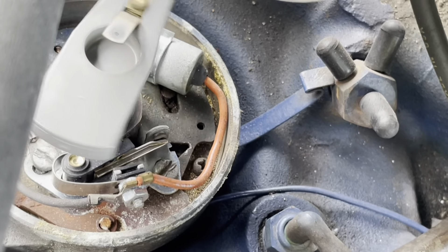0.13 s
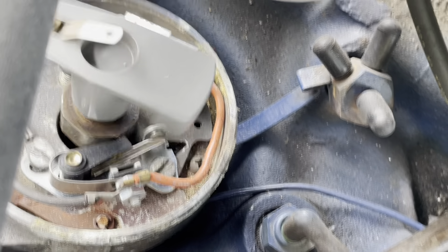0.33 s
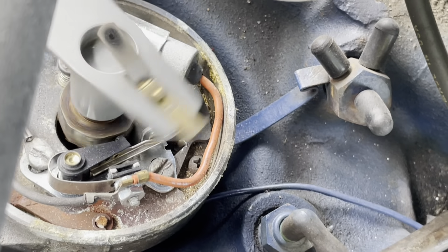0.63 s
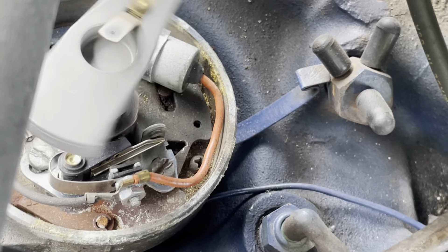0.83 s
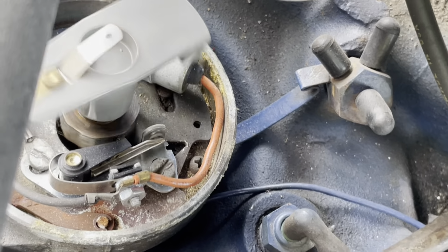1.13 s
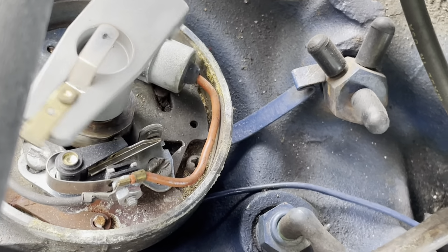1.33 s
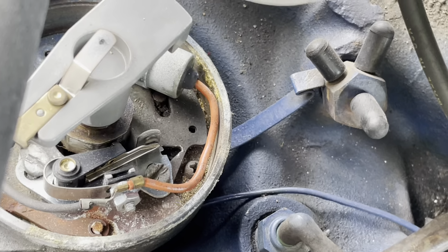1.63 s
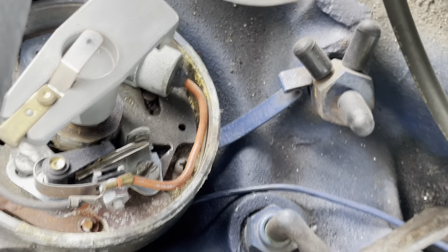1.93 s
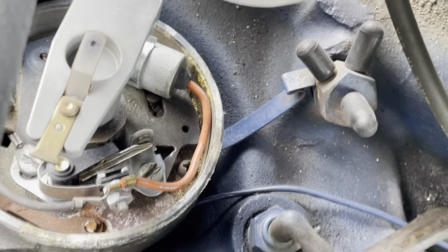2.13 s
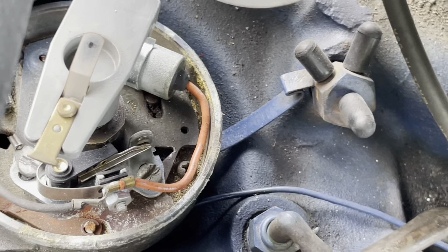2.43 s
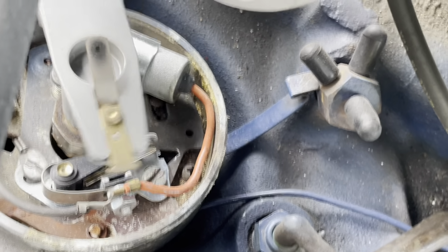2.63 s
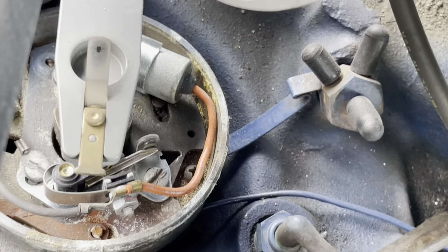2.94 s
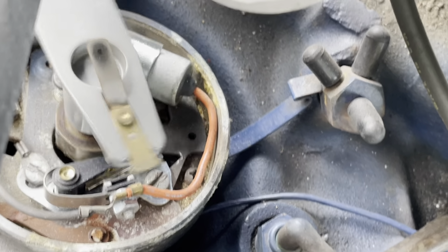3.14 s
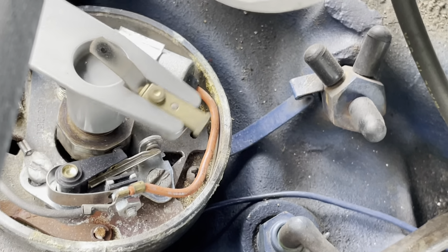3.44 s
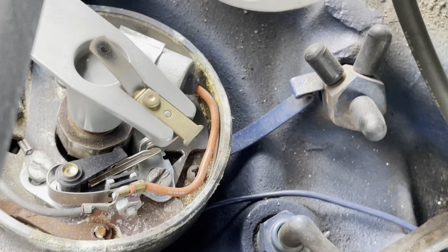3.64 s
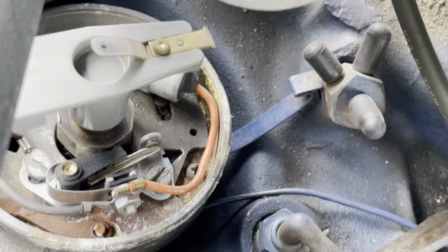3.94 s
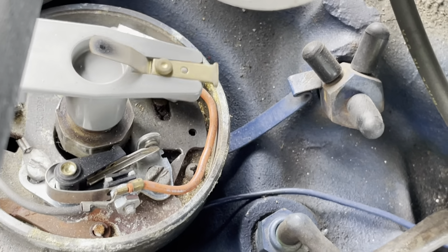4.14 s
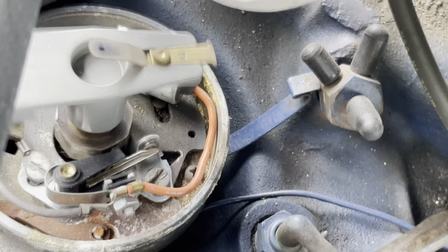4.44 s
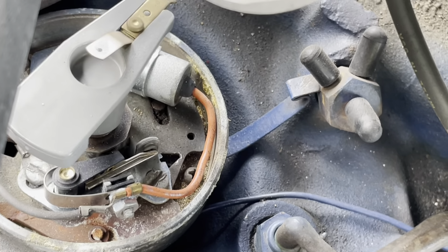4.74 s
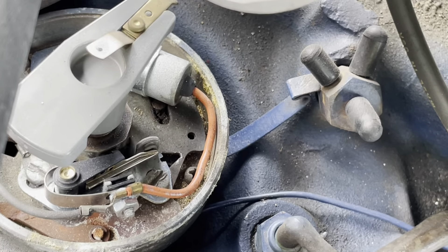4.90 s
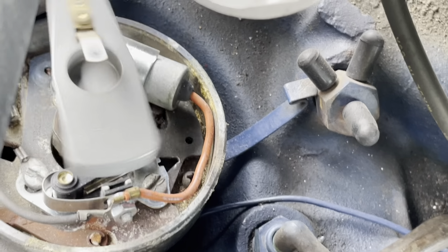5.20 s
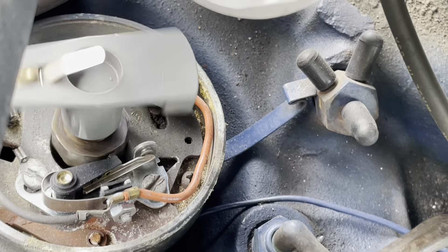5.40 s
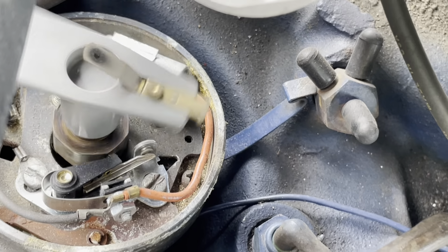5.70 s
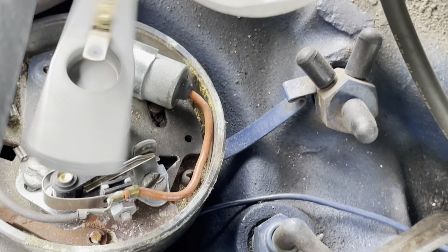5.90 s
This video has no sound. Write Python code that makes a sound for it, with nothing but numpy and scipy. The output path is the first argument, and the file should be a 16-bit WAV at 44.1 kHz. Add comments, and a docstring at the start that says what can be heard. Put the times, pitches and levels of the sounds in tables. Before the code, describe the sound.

A starter motor cranks an engine that never fires, whirrs down, grinds once, bumps four times with clunks and rattles, then cranks again, close up.

```python
"""In a garage, close above an open distributor, a starter turns over an engine that never fires.
A steady crank stops and the freed armature whirrs down; the pinion then clashes once with the ring gear.
Four short bumps follow, each a solenoid click, a slam, a coasting rattle and a pinion clack.
A second crank runs to the end. Gear teeth are gliding harmonics whose pitch sags at every compression;
rubbing and blows are dense random contacts coloured by metal resonances, and long rings are decaying sines."""
import sys
import numpy as np
from scipy import signal
from scipy.fft import rfft, irfft, next_fast_len
from scipy.io import wavfile

SR = 44100
rng = np.random.default_rng(int(sys.argv[2]) if len(sys.argv) > 2 else 0)


def wav_record(signal):
    """Record a signal, one row per channel, as 16-bit PCM in the file named by sys.argv[1]."""
    frames = np.transpose(np.atleast_2d(signal))
    bounded = np.clip(frames, -1, 1)
    # unit amplitude maps onto the largest positive 16-bit level
    quanta = np.round(bounded * 32767).astype(np.int16)
    wavfile.write(sys.argv[1], SR, quanta)


N = 267378
SIZE = next_fast_len(N + SR // 2) * 2
TIME = np.arange(N) / SR
FREQS = np.maximum(np.arange(SIZE // 2 + 1) * SR / SIZE, 1)


def from_db(db):
    """Decibels to gain."""
    return 10 ** (np.asarray(db) / 20)


def rms_one(x):
    """Scale to rms 1."""
    return x / np.sqrt(np.mean(x ** 2) + 1e-20)


def in_time(rows):
    """Draw each column of a table as a curve over every sample."""
    times, *columns = np.transpose(rows)
    return [np.interp(TIME, times, column) for column in columns]


def at_hz(points, hz):
    """Read a spectrum on a log-frequency axis."""
    f, value = np.transpose(points)
    return np.interp(np.log(hz), np.log(f), value)


def during(start, end, fade):
    """Envelope: 1 between two times, falling exponentially on both sides."""
    outside = np.maximum(np.maximum(start - TIME, TIME - end), 0)
    return np.exp(-np.minimum(outside / fade, 40))


def held(start, end, rise, t60):
    """Envelope: swells from the start, holds until the end, then dies away."""
    swell = np.clip((TIME - start) / rise, 0, 1)
    return swell * from_db(-60 * np.clip((TIME - end) / t60, 0, 4))


def hump(center, half):
    """Envelope: a bell-shaped swell, down to 1/e at half a length from its center."""
    return np.exp(-np.minimum(((TIME - center) / half) ** 2, 40))


def together(envelopes):
    """Envelope of unrelated sounds heard at once: their powers add."""
    return np.sqrt(sum(e ** 2 for e in envelopes))


def drift(rate):
    """Slow random wandering of rms 1; a higher rate [Hz] wanders faster."""
    knots = rng.standard_normal(int(N / SR * 400) + 2)
    memory = np.exp(-2 * np.pi * rate / 400)
    smooth = rms_one(signal.lfilter([1], [1, -memory], knots))
    return np.interp(TIME, np.linspace(0, N / SR, len(knots)), smooth)


def cut(x, hz, kind, order=2):
    """Butterworth filter."""
    return signal.sosfilt(signal.butter(order, hz, kind, fs=SR, output="sos"), x)


def sine(hz):
    """Sine that follows a moving pitch."""
    return np.sin(2 * np.pi * np.cumsum(hz) / SR)


def body(x, spectrum, modes=(), lift_db=0, size=8192):
    """Causal filter of unit power: a broad spectrum on which resonances stand out."""
    hz = np.maximum(np.arange(size // 2 + 1) * SR / size, 1)
    peaks = sum(from_db(db) / (1 + ((hz - f) / (width / 2)) ** 2) for f, width, db in modes)
    gain = rms_one(from_db(at_hz(spectrum, hz)) * (1 + from_db(lift_db) * peaks))
    # folding the cepstrum gives minimum phase, so nothing sounds ahead of its cause
    cepstrum = irfft(np.log(gain + 1e-6))
    cepstrum[1:size // 2] *= 2
    cepstrum[size // 2 + 1:] = 0
    impulse = irfft(np.exp(rfft(cepstrum)))
    return signal.oaconvolve(x, impulse)[:N]


def contacts(per_s, spread_db):
    """Dense tiny metal contacts at random instants, uneven in size and random in sign, rms 1."""
    sizes = from_db(spread_db * np.clip(rng.standard_normal(N), -2, 2)) * rng.choice([-1, 1], N)
    return rms_one(sizes * (rng.random(N) < per_s / SR))


def blows(rows, rise, t60, tail_db, tail_t60):
    """Each blow chatters briefly, then dies fast, leaving a weaker tail."""
    power = np.zeros(N)
    for s, db, chatter in rows:
        at = int(s * SR)
        age = TIME[:N - at][:SR]
        after = np.maximum(age - chatter, 0)
        shape = from_db(-60 * after / t60) + from_db(tail_db - 60 * after / tail_t60)
        power[at:at + len(age)] += (from_db(db) * shape * (1 - np.exp(-age / rise))) ** 2
    return np.sqrt(power) * contacts(per_s=9000, spread_db=5.5)


def rings(rows, modes):
    """Each blow sets lightly damped modes ringing for up to a second, at slightly uneven levels."""
    out, age = np.zeros(N + SR), TIME[:SR]
    for s, db, *_ in rows:
        for hz, mode_db, t60 in modes:
            level = from_db(db + mode_db + rng.normal(0, 0.5) - 60 * age / t60)
            out[int(s * SR):int(s * SR) + SR] += level * np.sin(2 * np.pi * hz * age)
    return out[:N]


# key on, the solenoid clicks and the pinion slams into the ring gear:
# (slam time [s], slam level [dB], chatter [s], click lead [s], click level [dB],
#  boom level [dB], nose ring level [dB], nose pitch [Hz])
KEY_ONS = [(1.914, -13, 0.014, 0.022, -14.5, -32, -11, 364),
           (2.512, -10.5, 0.0073, 0.014, -16, -34, -15.5, 358),
           (3.032, -13.5, 0.012, 0.022, -19, -20, -17.5, 327),
           (3.729, -12.5, 0.011, 0.024, -17, -21.5, -13.5, 346),
           (4.37, -12, 0.0078, 0.021, -19, -36, -20, 316.3),
           (5.033, -12, 0.0095, 0.021, -19, -22.5, -26, 342)]


def slams():
    """The pinion's blows: (time [s], level [dB], chatter [s])."""
    return [row[:3] for row in KEY_ONS]


# starter under power: (start [s], end [s])
CRANKS = [(0, 1.145), (5.08, 6.1)]
# key off, the solenoid lets go and the gears knock through their backlash:
# (time [s], click level [dB], knock level [dB], hiss level [dB], rattle level [dB], freewheel level [dB])
KEY_OFFS = [(1.143, -15.5, -19, -24, -30.5, -34.5), (2.05, -31, -34.5, -62, -35.5, -49.5),
            (2.624, -27, -28.5, -40.5, -31, -40.5), (3.23, -20.5, -20.5, -36, -32, -43),
            (3.891, -18.5, -24, -35, -33, -42), (4.512, -26.5, -28, -39.5, -31.5, -65)]
# shudder of the block: (frequency [Hz], density [dB per Hz])
RUMBLE_SPECTRUM = [(15, -45.5), (25, -27), (45, -2), (70, 5), (124, -1), (172, -2.5), (220, -6.5),
                   (290, -43), (480, -120)]
# the starter's torque bounces the block on its mounts, level under the slam:
# (frequency [Hz], level [dB], t60 [s])
BOUNCE_MODES = [(80, -20.5, 0.65)]
# heavy thuds of the rocking engine, and the low falling groan of the clash at 1.95 to 1.98 s:
# (time [s], level [dB], pitch [Hz], time to peak [s])
THUDS_AND_GROAN = [(1.318, -21, 147, 0.0072), (1.339, -23, 72.5, 0.0073), (1.389, -29, 47.2, 0.039),
                   (1.548, -28, 60, 0.011), (1.948, -17, 330.6, .016), (1.977, -20.5, 184.7, 0.028),
                   (5.971, -21.5, 66.6, 0.0081), (6.032, -17, 86.5, 0.0035)]
REST_DB, CRANK_SHAKE_DB, ON_JOLT_DB, OFF_JOLT_DB, JOLT_T60_S = -50, -41.5, -36, -40, 0.79
# after the long crank the block takes a while to settle
SETTLE_DB, SETTLE_T60_S = -32, 1.7


def mounts():
    """The cranked block shudders on rubber mounts, jolts at each key turn and thuds; the clash groans low."""
    first_end = CRANKS[0][1]
    shakes = [from_db(SETTLE_DB) * held(first_end, first_end, 0.026, SETTLE_T60_S)]
    shakes += [from_db(CRANK_SHAKE_DB) * during(start, end, fade=0.029) for start, end in CRANKS]
    jolts = [from_db(REST_DB)]
    jolts += [from_db(ON_JOLT_DB) * held(s, s + 0.027, 0.016, JOLT_T60_S) for s, *_ in slams()]
    jolts += [from_db(OFF_JOLT_DB) * held(s, s + 0.045, 0.015, JOLT_T60_S) for s, *_ in KEY_OFFS]
    deep = body(rng.standard_normal(N), RUMBLE_SPECTRUM)
    # short jolts do not reach the deepest sway
    shallow = cut(body(rng.standard_normal(N), RUMBLE_SPECTRUM), 62, "high")
    bounce = cut(rings(slams(), BOUNCE_MODES), 46, "high")
    out = together(shakes) * deep + together(jolts) * shallow + bounce
    for s, db, hz, swell in THUDS_AND_GROAN:
        age = np.clip(TIME - s, 0, 1)
        envelope = age / swell * np.exp(1 - age / swell)
        out = out + from_db(db) * envelope * np.sin(2 * np.pi * hz * age)
    return out


# bearings whirr while the freed armature spins down: (time [s], level [dB])
SPIN_DOWN = [(1.15, -87), (1.22, -38.5), (1.5, -41.5), (1.88, -47.5), (1.93, -100)]
# colour of the whirr: (frequency [Hz], density [dB per Hz])
WHIRR_SPECTRUM = [(200, -20), (800, -33.5), (1200, -19), (2000, -34), (3000, -18), (4800, -19), (5400, -10),
                  (5950, -15), (6400, -13.5), (9000, -38.5)]
WHIRR_FLICKER_DB = 1.2


def spin_down():
    """The armature freewheels after the long crank; dense bearing contacts whirr unevenly."""
    level_db = in_time(SPIN_DOWN)[0] + WHIRR_FLICKER_DB * drift(12)
    return from_db(level_db) * body(contacts(per_s=2500, spread_db=0.5), WHIRR_SPECTRUM)


# the rocking engine drags the gears back in short scrapes: (time [s], level [dB], half length [s])
SCRAPES = [(1.3, -32, .011), (1.32, -34, 0.0076), (2.669, -51, 0.017), (2.818, -40, 0.042),
           (3.15, -46, 0.03), (3.417, -35, 0.025), (3.453, -37, 0.021), (3.857, -41, .015),
           (4.087, -36.5, 0.028), (4.602, -36.5, .04), (4.728, -53, 0.027)]
# colour of the scrapes: (frequency [Hz], density [dB per Hz])
SCRAPE_SPECTRUM = [(300, -36), (900, 7.5), (1500, -10), (2400, -2), (3100, -4), (4500, -9.5), (7000, -16.5),
                   (12000, -29.5)]
# resonances of the starter housing, before each layer's lift: (frequency [Hz], width [Hz], level [dB])
HOUSING_MODES = [(455, 37, -5), (573, 27, -5.5), (807, 51, -2.5), (1680, 36, 0.5), (1935, 90, 0),
                 (2243, 83, -1.5), (3610, 70, -6.5), (4090, 81, -5), (4620, 33, -14), (4860, 46, -8),
                 (5240, 80, -12), (5750, 110, -4), (6340, 50, -32.5), (6625, 40, -13.5), (7020, 45, 0.5)]


def scrapes():
    """Dry, gritty drags of the gear teeth: sparse contacts ringing the housing."""
    swell = together(from_db(db) * hump(s, half) for s, db, half in SCRAPES)
    return swell * body(contacts(per_s=930, spread_db=1), SCRAPE_SPECTRUM, HOUSING_MODES, lift_db=7)


# squeaks, groans and short rings of metal:
# (time [s], level [dB], half length [s], pitch [Hz], glide [Hz per s])
METAL_NOTES = [(0.022, -24.5, 0.073, 543, -76), (0.022, -29.5, 0.027, 224, -100),
               (0.227, -20.5, 0.019, 2636, -200), (0.243, -19.5, .014, 1270, -5500),
               (0.26, -21, 0.012, 772, -1200), (0.288, -25, 0.025, 388, -200),
               (1.294, -27, 0.0079, 1110, -2500), (1.317, -29, .009, 1030, -2500),
               (2.27, -43, 0.08, 727, -42), (2.043, -29.5, 0.0492, 190.4, -280),
               (2.268, -33, 0.061, 165, -59.5), (4.464, -31, .05, 808, -150),
               (4.4, -27, 0.0315, 567.6, -400), (4.532, -21.5, 0.07, 543, -110),
               (5.129, -28, .022, 790, 499.5), (5.203, -25.5, .025, 761, -900),
               (5.273, -32, 0.022, 656, -300), (5.45, -29.5, .045, 908, -150),
               (5.54, -26, 0.024, 800, 200.5), (5.818, -25.5, 0.032, 545, 0)]
# the pinion squeaks along its shaft until it stops: (time [s], level [dB], half length [s], stop [s])
SQUEAKS = [(2.874, -34, .055, 2.912), (3.425, -41, .02, 3.45), (3.495, -41, .025, 3.53),
           (4.118, -37, .058, 4.16)]
SQUEAK_HZ, SQUEAK_BEND_HZ = 5735, 50


def metal_notes():
    """Thin, mostly falling notes of rubbed or ringing metal; the pinion's squeak arches in pitch."""
    waver = 1 + 0.002 * drift(30)
    out = 0
    for s, db, half, hz, glide in METAL_NOTES:
        pitch = hz + glide * np.clip(TIME - s, -2 * half, 2 * half)
        out = out + from_db(db) * hump(s, half) * sine(pitch * waver)
    for s, db, half, stop in SQUEAKS:
        # highest where it slides fastest, at the peak of the swell
        away = np.minimum(((TIME - s) / half) ** 2, 40)
        level = from_db(db + 3.4 * drift(45)) * np.exp(-away) * during(0, stop, fade=0.0036)
        out = out + level * sine((SQUEAK_HZ - SQUEAK_BEND_HZ * away) * waver)
    return out


# the freewheeling hiss is set against the freewheeling rattle
FREEWHEEL_HISS_DB, FREEWHEEL_T60_S, FREEWHEEL_HISS_T60_S = -8.5, 2.14, 3.8


def freewheeling(t60):
    """Envelope of the parts that keep moving long after each key off."""
    return together(from_db(db) * held(off, off, 0.018, t60) for off, *_, db in KEY_OFFS)


# compression rolls the engine back until the pinion drops out:
# (time [s], clack level [dB], chatter [s], flywheel ring level [dB], rolling [s],
#  rattle level [dB], hiss level [dB])
DROP_OUTS = [(2.872, -21, 0.00087, -18.5, 0.12, -45, -44),
             (3.493, -19.5, 0.0007, -19.5, 0.13, -37.5, -42.5),
             (4.121, -21, 0.0022, -25.5, 0.13, -36.5, -40.5), (4.791, -24, 0.0065, -31.5, 0.14, -68, -53)]
# colour of the loose gears: (frequency [Hz], density [dB per Hz])
RATTLE_SPECTRUM = [(59, -53), (100, -17), (254, -8), (471, -4.5), (545, -5), (643, -15.5), (807, -8),
                   (895, -17), (1200, -15.5), (3230, -22), (4980, -22.5), (7220, -29.5), (8180, -33),
                   (12100, -41.5), (14000, -52.5)]
# resonances of the engine block, before each layer's lift: (frequency [Hz], width [Hz], level [dB])
BLOCK_MODES = [(358, 59, -5), (440, 16, -2), (540.5, 22, 1.5), (803, 20, 0.5), (919, 11, 0.5),
               (1125, 58, -4.5), (1278, 70, -2), (1440, 26, -3), (1490, 22, -1.5), (1594, 57, -2),
               (2280, 38, 5), (2445, 72, 1), (2600, 33, -11), (3074, 67, -8.5), (4140, 82, -3.5),
               (4400, 41, -1), (4970, 120, -4), (5740, 70, 0), (7180, 110, -0.5)]
# how fast the gear rattle and armature hiss die after key off, and the rattle as the engine rolls back
RATTLE_T60_S, HISS_T60_S, ROLL_T60_S = 0.94, 0.19, 0.14


def coast(tooth_hz=330, slowing_s=0.48, tooth_depth=0.077):
    """Unloaded gears rattle ever slower after each slam and the armature hisses; both return on roll-back."""
    starts = np.array([0] + [s for s, *_ in slams()])
    rattles = [freewheeling(FREEWHEEL_T60_S)]
    hisses = [from_db(FREEWHEEL_HISS_DB) * freewheeling(FREEWHEEL_HISS_T60_S)]
    for off, _, _, hiss_db, rattle_db, _ in KEY_OFFS:
        # a bump rattles from its slam on, the long crank only once the power is off
        on = starts[starts < off][-1] or off
        rattles.append(from_db(rattle_db) * held(on, off, 0.021, RATTLE_T60_S))
        hisses.append(from_db(hiss_db) * held(on, off, 0.025, HISS_T60_S))
    for out, *_, rolling, rattle_db, hiss_db in DROP_OUTS:
        rattles.append(from_db(rattle_db) * held(out - rolling, out - rolling / 2, 0.00691, ROLL_T60_S))
        hisses.append(from_db(hiss_db) * held(out - rolling, out, 0.051, 0.14))
    age = TIME - starts[np.searchsorted(starts, TIME, side="right") - 1]
    tooth = 2 * np.pi * np.cumsum(tooth_hz * np.exp(-age / slowing_s)) / SR
    grains = contacts(per_s=4000, spread_db=-1.5) * np.exp(tooth_depth * np.cos(tooth))
    rub = body(grains, RATTLE_SPECTRUM, BLOCK_MODES, lift_db=-2.5)
    rattle = rms_one(cut(rub, 1300, "low")) * together(rattles)
    hiss = rms_one(cut(rub, 1900, "high")) * together(hisses)
    return rattle - hiss


# stray knocks in the gears: (time [s], level [dB], chatter [s], bright tick level [dB])
KNOCKS = [(.324, -23.5, 0.0056, -39), (.829, -34, 0.033, -44), (1.185, -24, 0.01, -26.5),
          (1.335, -48.5, .008, -36), (1.553, -50, 0.0032, -57), (1.725, -44, 0.004, -65),
          (2.748, -35, .004, -52), (3.386, -38, .004, -50), (4.016, -39, .004, -49),
          (5.511, -28.5, .01, -42)]
# colour of the knocks: (frequency [Hz], density [dB per Hz])
KNOCK_SPECTRUM = [(59, -37), (100, -9), (264, -12), (534, -1), (774, -9), (1010, -14.5), (3230, -18.5),
                  (3500, -22), (5640, -23), (7220, -26.5), (8180, -32.5), (10700, -43), (14000, -41.5)]
# long rings of the flywheel, level under the blow: (frequency [Hz], level [dB], t60 [s])
FLYWHEEL_MODES = [(440, -13, .25), (540, -10, .6), (812, -14, .25), (1265, -23, .14)]
BACKLASH_CHATTER_S = 0.027


def clacks():
    """Backlash knocks and the returning pinion, which leaves the flywheel ringing."""
    backlash = [row[:3] for row in KNOCKS]
    backlash += [(s, db, BACKLASH_CHATTER_S) for s, _, db, *_ in KEY_OFFS]
    returns = [row[:3] for row in DROP_OUTS]
    knocks = blows(backlash, rise=0.0018, t60=0.17, tail_db=-20.5, tail_t60=0.25)
    releases = blows(returns, rise=0.0013, t60=0.12, tail_db=-20.5, tail_t60=0.36)
    freed = rings([(s, db) for s, _, _, db, *_ in DROP_OUTS], FLYWHEEL_MODES)
    # the engaged pinion damps the flywheel, so knocks ring it less
    damped = from_db(-5) * rings(backlash, FLYWHEEL_MODES)
    return body(knocks + releases, KNOCK_SPECTRUM, HOUSING_MODES, lift_db=-3) + freed + damped


# colour of the clash: (frequency [Hz], density [dB per Hz])
CLASH_SPECTRUM = [(47, -75.5), (80, -31), (332, -1.5), (396, -4), (550, -3), (2660, -11.5), (4210, -9),
                  (7280, -15), (8120, -44), (9270, -22), (12300, -30.5), (15000, -53)]
# resonances of the skidding ring gear, before the lift: (frequency [Hz], width [Hz], level [dB])
RING_GEAR_MODES = [(336, 35, -5), (583, 50, -4.5), (820, 45, -5.5), (1650, 45, -8), (2350, 150, -7.5),
                   (4100, 90, -7), (5730, 51, -7), (6900, 40, -10)]
# a sheet panel rings on after the clash, level before the strike: (frequency [Hz], level [dB], t60 [s])
PANEL_MODES = [(165, -32, 1.7), (175, -36, .9), (431, -44, 1.3), (538, -37, .8), (727, -49, 2.6),
               (1642, -53, 2.0)]
CLASH_FROM_S, CLASH_TO_S, CLASH_DB, CLASH_TEETH_PER_S, CLASH_T60_S = 1.941, 2.036, -16, 220, 0.06
PANEL_STRUCK_S, PANEL_STRIKE_DB = 2.0, 3


def clash():
    """Pinion teeth skid once over the ring gear at a wandering rate, and a sheet panel rings on."""
    tooth = np.cumsum(CLASH_TEETH_PER_S * (1 + 0.094 * drift(40))) / SR % 1
    teeth = rms_one(np.exp(-tooth / 1.6))
    envelope = from_db(CLASH_DB) * held(CLASH_FROM_S, CLASH_TO_S, 0.0047, CLASH_T60_S)
    skid = envelope * teeth * contacts(per_s=5600, spread_db=0.0)
    panel = rings([(PANEL_STRUCK_S, PANEL_STRIKE_DB)], PANEL_MODES) * from_db(2.5 * drift(8))
    return body(skid, CLASH_SPECTRUM, RING_GEAR_MODES, lift_db=5.0) + panel


# colour of the solenoid: (frequency [Hz], density [dB per Hz])
CLICK_SPECTRUM = [(88, -34.5), (150, -20), (393, -11), (1200, -15), (1600, -11.5), (3210, -14),
                  (4810, -5.5), (8250, -16), (10400, -17), (15000, -21.5)]
# colour of the slamming pinion: (frequency [Hz], density [dB per Hz])
SLAM_SPECTRUM = [(47, -41.5), (80, -4.5), (347, -3.5), (669, -2.5), (815, -1.5), (1010, -8), (1300, 0.5),
                 (1640, -4), (2840, -5), (4210, -4.5), (7120, -8.5), (8300, -15), (9270, -14),
                 (12000, -21.5), (15000, -25.5)]
CLICK_CHATTER_S, LET_GO_CHATTER_S = 0.019, 0.0044
# the plunger ticks against its stop as the pinion drops out, this much under the clack
STOP_TICK_DB = -8.5
# the pinion seats this long after the slam begins; the housing's ring is set against the slam
SEAT_S, SEAT_RING_DB, NOSE_T60_S = 0.006, -9, 0.16


def engagements():
    """The solenoid clicks, then the pinion slams home and sets the housing, its nose and the block sounding."""
    pulls = [(s - lead, db, CLICK_CHATTER_S) for s, _, _, lead, db, *_ in KEY_ONS]
    ticks = [(s, db, LET_GO_CHATTER_S) for s, db, *_ in KEY_OFFS]
    ticks += [(s, db + STOP_TICK_DB, LET_GO_CHATTER_S) for s, db, *_ in DROP_OUTS]
    ticks += [(s, db, chatter) for s, _, chatter, db in KNOCKS]
    plunger = blows(pulls, rise=0.0053, t60=0.043, tail_db=-33, tail_t60=0.27)
    plunger = plunger + blows(ticks, rise=0.0026, t60=0.028, tail_db=-28.5, tail_t60=0.27)
    click = body(plunger, CLICK_SPECTRUM, HOUSING_MODES, lift_db=2)
    pinion = blows(slams(), rise=0.0014, t60=0.063, tail_db=-10.0, tail_t60=0.25)
    slam = body(pinion, SLAM_SPECTRUM, HOUSING_MODES, lift_db=4)
    # the pinion seats with one hard blow; narrow resonances ring longest
    housing = [(hz, db, np.log(1000) / (np.pi * width)) for hz, width, db in HOUSING_MODES]
    seat = rings([(s + SEAT_S, db + SEAT_RING_DB) for s, db, _ in slams()], housing)
    nose = sum(rings([(s + SEAT_S, db)], [(hz, 0, NOSE_T60_S)]) for s, *_, db, hz in KEY_ONS)
    # the heavy block answers later and lower
    booms = [(s, db, chatter) for s, _, chatter, _, _, db, *_ in KEY_ONS]
    answer = blows(booms, rise=0.0076, t60=0.32, tail_db=-16.0, tail_t60=0.68)
    boom = cut(body(answer, SLAM_SPECTRUM), 1100, "low")
    return click + slam + seat + nose + boom


# how well the housing radiates the tooth harmonics: (frequency [Hz], level [dB])
WHINE_RADIATION = [(250, -21), (385, -4), (470, -13), (600, -6.5), (760, 0.5), (860, -8), (950, -11),
                   (1080, -7), (1250, -2), (1450, -8.5), (1620, -1), (1750, -10.5), (1930, -9.5),
                   (2100, -9.5), (2300, -9), (2450, -13.5), (2700, -10.5), (3100, -14.5), (4300, -14.5),
                   (6000, -22)]
WHINE_FLICKER_DB, WHINE_LIFT_DB = 2.6, 6


def whine(tooth_hz, runout=0.4, wear=0.49):
    """Tooth harmonics glide through block resonances; a nine-tooth pinion runs off centre, worn every third."""
    tooth = 2 * np.pi * np.cumsum(tooth_hz) / SR
    out = 0
    for k in range(1, 13):
        off_centre = np.cos(tooth / 9 + rng.uniform(0, 2 * np.pi))
        worn = np.cos(tooth / 3 + rng.uniform(0, 2 * np.pi))
        bite = 1 + runout * off_centre + wear * worn
        level = from_db(at_hz(WHINE_RADIATION, k * tooth_hz) + WHINE_FLICKER_DB * drift(25))
        out = out + bite * level * np.sin(k * tooth + 0.4 * drift(40))
    flat = [(1000, 0)]
    return body(out, flat, BLOCK_MODES, lift_db=WHINE_LIFT_DB)


# the starter only begins to spin up towards this tooth rate; the times are exponential time constants
BUMP_TOOTH_HZ, BUMP_SPIN_UP_S, BUMP_RUN_DOWN_S = 380.5, 0.08, 0.3
BUMP_WHINE_DB, BUMP_WHINE_T60_S = -39, 0.31


def bumps():
    """In the clash and each short bump the whine rises while the key is held and sinks after it."""
    tooth_hz, level = np.full(N, 1.0), 0
    # the first key off ends the long crank, so the pairs begin with the second
    for (on, *_), (off, *_) in zip(KEY_ONS, KEY_OFFS[1:]):
        spin_up = 1 - np.exp(-np.maximum(TIME - on, 0) / BUMP_SPIN_UP_S)
        run_down = np.exp(-np.maximum(TIME - off, 0) / BUMP_RUN_DOWN_S)
        tooth_hz = np.where(TIME > on, 1 + BUMP_TOOTH_HZ * spin_up * run_down, tooth_hz)
        level = level + held(on, off, 0.028, BUMP_WHINE_T60_S)
    return from_db(BUMP_WHINE_DB) * level * whine(tooth_hz)


# each compression is one chug of the cranking engine:
# (time [s], mean tooth rate [Hz], peak whine level [dB], mean growl level [dB], mean rasp level [dB])
COMPRESSIONS = [(0.0, 382.4, -51.5, -30, -39), (0.119, 364.5, -26, -27, -33.5),
                (.247, 412.6, -29.5, -31, -27), (.345, 477.5, -25.5, -30, -20.5),
                (.425, 484.3, -22, -31, -26.5), (0.515, 477.7, -22.5, -26.5, -27.5),
                (0.604, 477.4, -27.5, -26.5, -25), (0.686, 483, -25.5, -30.5, -22.5),
                (.77, 489, -25.5, -31, -25), (.853, 482.4, -22, -20.5, -29),
                (0.942, 475.7, -25.5, -30, -26.5), (1.032, 481, -24, -29, -23),
                (1.103, 480, -23, -30.5, -25), (5.121, 400.7, -40.5, -33, -47),
                (5.225, 378.5, -30, -30.5, -35), (5.341, 413.8, -25, -32.5, -26.5),
                (5.443, 449.7, -23, -34, -28), (5.53, 474, -22, -28, -31), (5.629, 454, -23, -32.5, -28),
                (5.711, 472.6, -23, -34, -24.5), (5.8, 477.7, -23, -28, -26.5),
                (5.884, 476, -23, -28.5, -30.5), (5.972, 474.5, -24.5, -30.5, -26),
                (6.06, 486, -21, -30, -26)]
# colour of the rubbing gears: (frequency [Hz], density [dB per Hz])
GEAR_SPECTRUM = [(59, -39), (100, -37), (211, -1.5), (270, -15), (400, -1.5), (540, -4), (680, -8.5),
                 (807, -4), (993, -9), (1400, -4.5), (1730, -10.5), (1900, -3.5), (2100, -10), (2370, -9.5),
                 (2650, -8), (5870, -20), (7220, -25), (8350, -29.5), (10900, -35.5), (14000, -41.5)]
# the engine overruns the starter and the teeth go slack, until the first knock takes them up:
# (start [s], end [s], level change [dB])
SLACK = (0.291, 0.325, -8)
# the load swings the pitch by this share at full speed; the slower the starter turns, the deeper the sag
SAG, FULL_TOOTH_HZ, SLOW_SAG_POWER = 0.0524, 480, 2.5
# the load also swells each layer, by so many dB either side of its middle
WHINE_SWELL_DB, GROWL_SWELL_DB, RASP_SWELL_DB = 6.5, 2, 1.3
# the growl peaks after the whine and the rasp before it, by these shares of a stroke
GROWL_LAG, RASP_LEAD = 0.1, 0.21
RASP_FLICKER_DB, GEAR_LIFT_DB = 0.84, 1


def crank(start, end, jitter=0.0036):
    """Each compression loads the gear teeth and slows the starter, then the engine runs ahead again."""
    rows = [row for row in COMPRESSIONS if start - 0.05 < row[0] < end + 0.05]
    mean_hz, whine_db, growl_db, rasp_db = in_time(rows)
    times = np.transpose(rows)[0]
    # one more stroke at either end keeps the cycle turning
    times = np.r_[2 * times[0] - times[1], times, 2 * times[-1] - times[-2]]
    turn = 2 * np.pi * np.interp(TIME, times, np.arange(len(times)))
    sag = SAG * (FULL_TOOTH_HZ / mean_hz) ** SLOW_SAG_POWER
    tooth_hz = mean_hz * (1 - sag * np.sin(turn) + jitter * drift(44.6))
    gears = whine(tooth_hz) * from_db(whine_db + WHINE_SWELL_DB * (np.cos(turn) - 1))
    # the teeth rub hardest as they meet
    meeting = 1 + 0.18 * np.cos(2 * np.pi * np.cumsum(tooth_hz) / SR)
    grains = contacts(per_s=5000, spread_db=0.5) * meeting
    rub = body(grains, GEAR_SPECTRUM, BLOCK_MODES, lift_db=GEAR_LIFT_DB)
    growl_swell_db = GROWL_SWELL_DB * np.cos(turn - 2 * np.pi * GROWL_LAG)
    growl = rms_one(cut(rub, 1420, "low")) * from_db(growl_db + growl_swell_db)
    # the grinding is uneven
    rasp_swell_db = RASP_SWELL_DB * np.cos(turn + 2 * np.pi * RASP_LEAD) + RASP_FLICKER_DB * drift(30)
    rasp = rms_one(cut(rub, 3840, "high")) * from_db(rasp_db + rasp_swell_db)
    slack = from_db(SLACK[2] * during(SLACK[0], SLACK[1], fade=0.003))
    return (gears + growl - rasp) * slack * during(start, end, fade=0.025)


def reflections(t60, delay):
    """A dense decaying train of echoes, of unit power, as a frequency response."""
    age = TIME[:SR // 2]
    echoes = rng.standard_normal(len(age)) * from_db(-60 * age / t60) * (age > delay)
    return rfft(echoes / np.sqrt(np.sum(echoes ** 2)), SIZE)


# stereo spread: (frequency [Hz], side level against the dry sound [dB])
WIDTH = [(60, -16), (125, -12), (250, -10), (500, -9), (900, -3.5), (1500, -5.5), (2500, -12.5),
         (6000, -78.5), (12000, -20)]
GARAGE_DB, GARAGE_T60_S = -20.0, 0.014


def scene():
    """All sources in an engine bay whose metal walls colour treble and spread the middle; a little garage."""
    dry = mounts() + spin_down() + scrapes() + metal_notes() + coast() + clacks() + clash() + engagements()
    dry = dry + bumps() + sum(crank(start, end) for start, end in CRANKS)
    dry = rfft(dry, SIZE)
    # bay echoes grow towards the treble
    bay = 0.35 * FREQS / (FREQS + 1500)
    walls = bay * reflections(t60=0.033, delay=0.0012)
    garage = from_db(GARAGE_DB) * reflections(GARAGE_T60_S, delay=0.036)
    mid = dry * (1 + walls + garage) / np.sqrt(1 + bay ** 2)
    side = dry * from_db(at_hz(WIDTH, FREQS)) * reflections(t60=0.17, delay=0.002)
    return irfft(np.array([mid + side, mid - side]), SIZE)[:, :N]


# phase between the two listening ports: (frequency [Hz], phase [rad])
PORT_PHASE = [(100, 0), (6200, 0), (8300, -3.1), (10400, -5.6), (12300, -6.6), (13600, -9.2), (16100, -9.5)]
CUTOFF_HZ = 15400


def record(dry):
    """The two ports fall out of step in the treble; peaks are rounded and the top is cut."""
    turned = rfft(dry[1], SIZE) * np.exp(-1j * at_hz(PORT_PHASE, FREQS))
    right = irfft(turned, SIZE)[:N]
    rounded = 1.307 * np.tanh(np.array([dry[0], right]) / 1.367)
    return cut(rounded, CUTOFF_HZ, "low", order=14)


dry = scene()
out = record(dry)
wav_record(out)
```